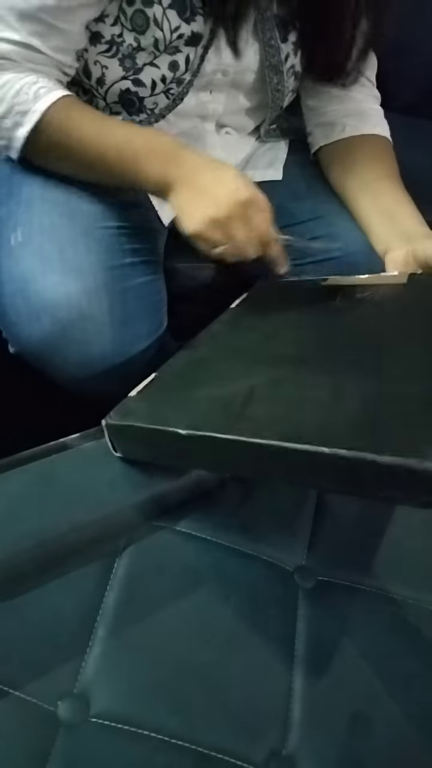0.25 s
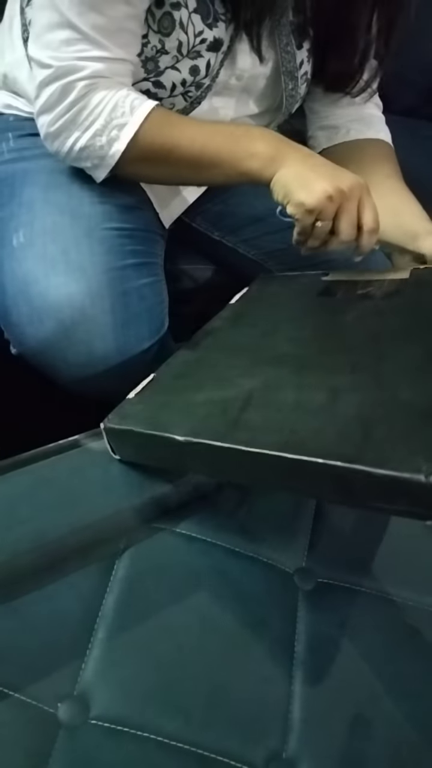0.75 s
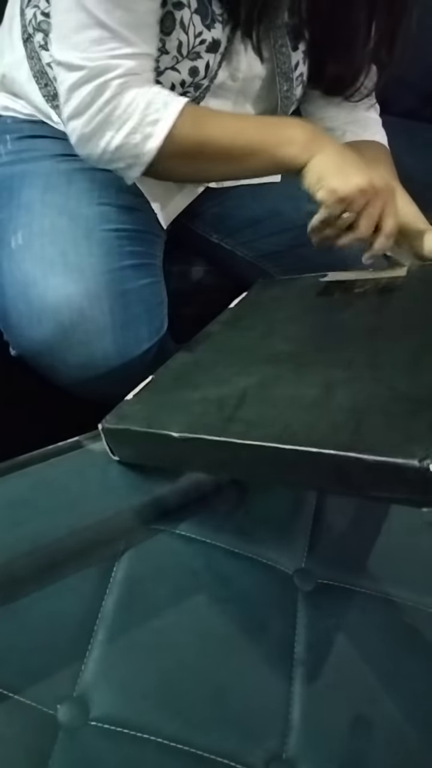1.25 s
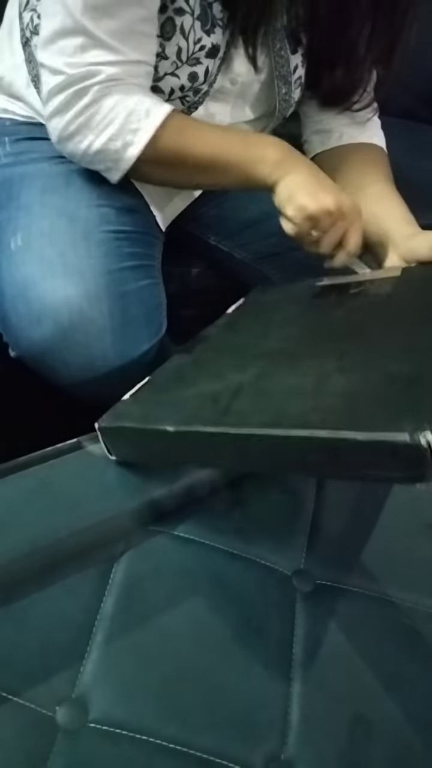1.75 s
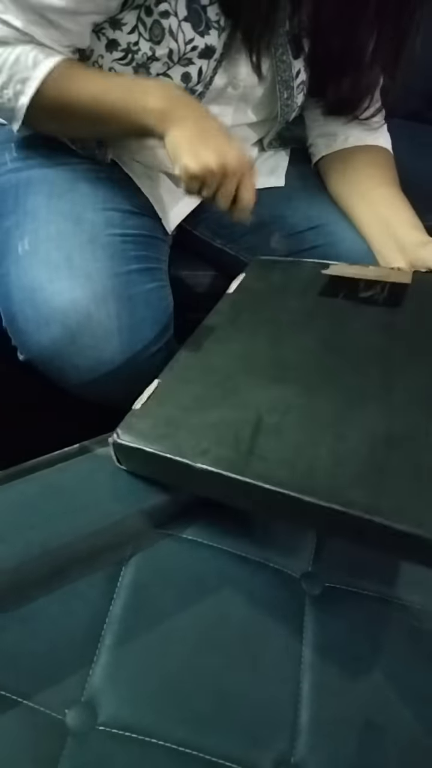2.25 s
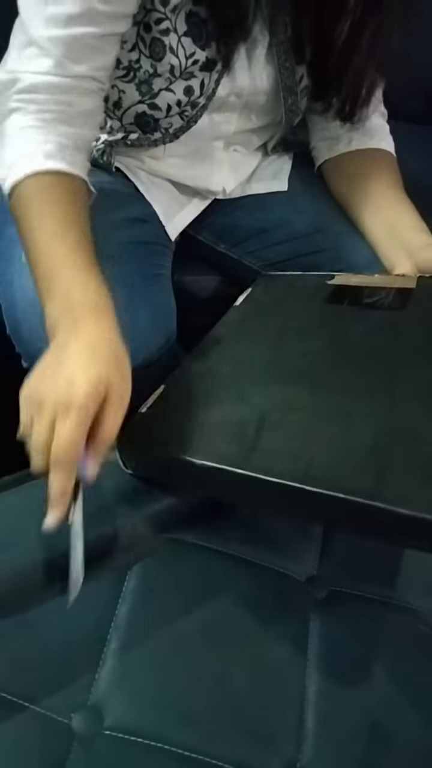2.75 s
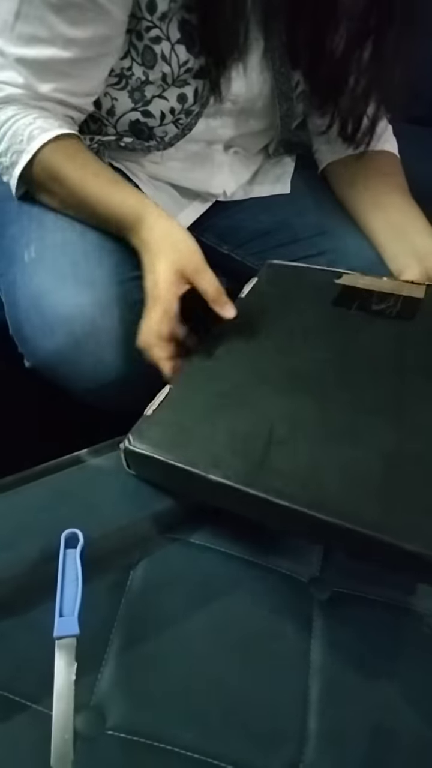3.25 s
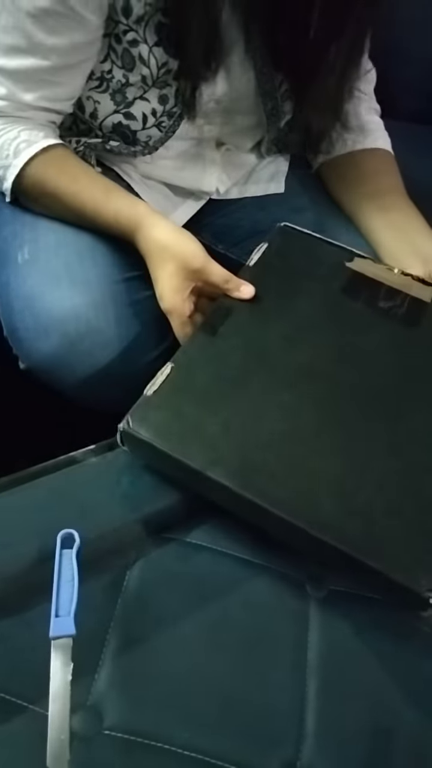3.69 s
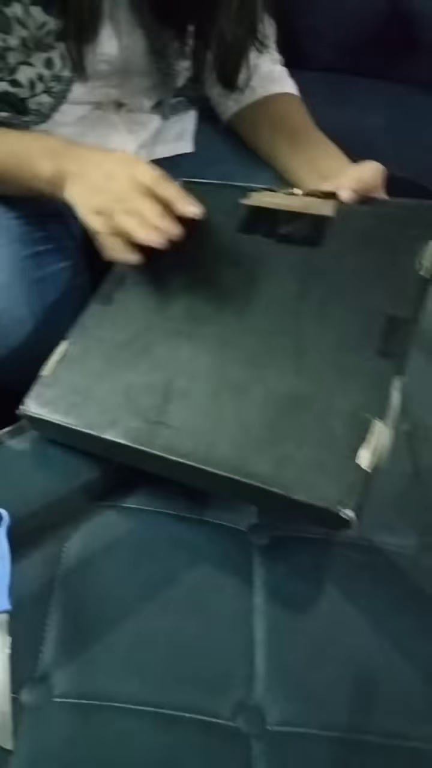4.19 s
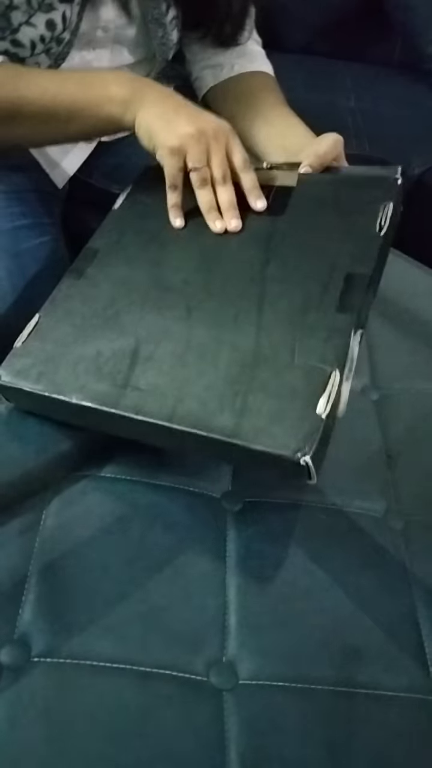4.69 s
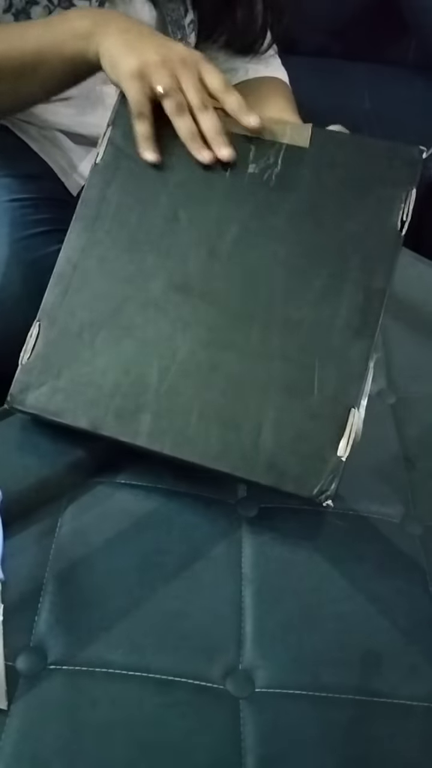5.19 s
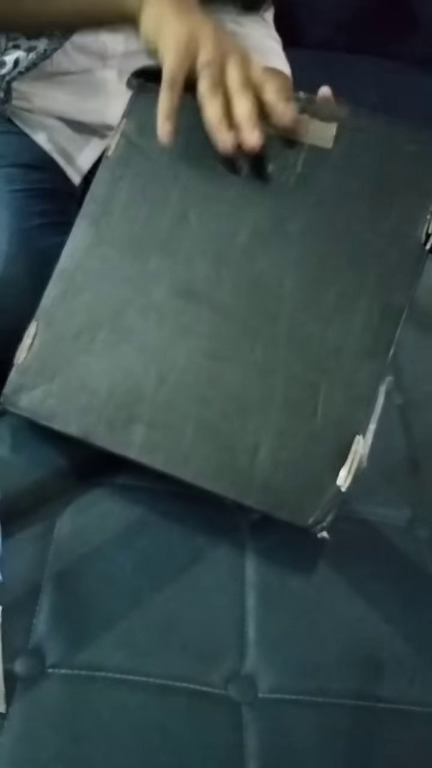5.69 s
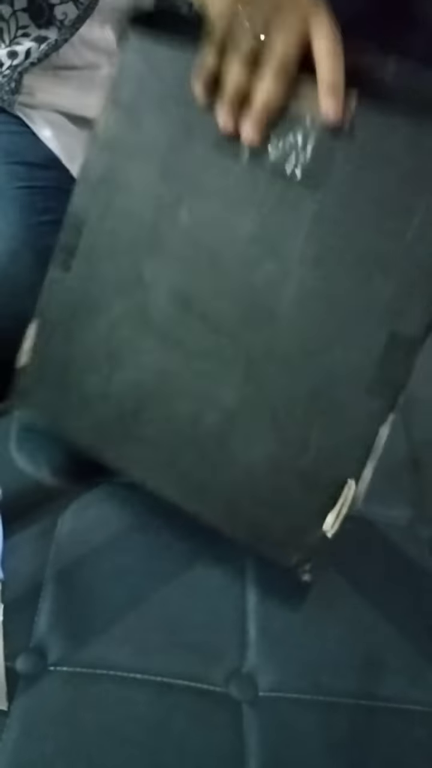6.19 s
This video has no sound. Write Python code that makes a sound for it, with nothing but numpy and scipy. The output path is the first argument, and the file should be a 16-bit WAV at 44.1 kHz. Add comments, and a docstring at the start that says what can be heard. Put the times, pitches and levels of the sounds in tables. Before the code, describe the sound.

Close up in a quiet, hissing small room, a knife cuts packing tape on a flat cardboard box with dry crackles and short rasps, peaking in a burst of sharp snaps. After a pause the knife drops on a glass table, a fast bright metallic chatter with brief glassy ringing. Then the box is turned with soft hollow knocks, and fingers rub and pick lightly at the tape.

```python
"""A knife slits the packing tape of a flat cardboard box in short strokes, then drops, clattering and ringing,
on a glass table; hands turn the box and pick at the tape. Heard close up in a quiet, hissing room, an insect outside.
Tape and cardboard are friction clicks through coloured filters; snaps, knocks and knife are noise bursts and
struck resonances. Creak is a wavering sine, scuffs and insect are resonant noise, rumble, hum and hiss are
filtered noise. A diffuse room tail follows the table sounds and the microphone signal is cut steeply at the top."""
import sys
import numpy as np
from scipy import signal
from scipy.fft import rfft, irfft
from scipy.io import wavfile

SR = 44100
rng = np.random.default_rng(int(sys.argv[2]) if len(sys.argv) > 2 else 0)


def wrap_up_sound(samples):
    """Save the sound to the file named by the first command line argument, as 16-bit audio."""
    columns = np.atleast_2d(samples).T
    # keep every value between -1 and 1, then stretch to whole-number steps
    tamed = np.clip(columns, -1, 1)
    steps = np.round(tamed * 32767).astype(np.int16)
    wavfile.write(sys.argv[1], SR, steps)


N = 283853  # samples


def amp(db):
    """Decibels to gain."""
    return 10 ** (np.asarray(db) / 20)


def rms_one(x):
    """Scales to rms 1."""
    return x / np.sqrt(np.mean(x ** 2) + 1e-20)


def in_time(rows):
    """Interpolates each column of a curve table to one value a sample; the first column is time."""
    s, *columns = np.transpose(rows)
    return [np.interp(np.arange(N) / SR, s, c) for c in columns]


def kernel(spectrum, size=4096):
    """Minimum-phase impulse response of a (hz, level_db) spectrum, from the folded cepstrum; energy 1."""
    hz, level_db = np.transpose(spectrum)
    log_grid = np.log(np.fft.rfftfreq(size, 1 / SR) + 1)
    level_on_grid = np.interp(log_grid, np.log(hz), level_db)
    cepstrum = irfft(np.log(amp(level_on_grid)))
    # fold the second half onto the first
    cepstrum[1:size // 2] *= 2
    cepstrum[size // 2 + 1:] = 0
    response = irfft(np.exp(rfft(cepstrum)))
    return response / np.sqrt(np.sum(response ** 2))


def colour(x, spectrum):
    """Filters x by a spectrum."""
    return signal.fftconvolve(x, kernel(spectrum))[:len(x)]


def drift(rate_hz):
    """Slow random wandering of rms 1: noise below rate_hz, after a second to settle."""
    noise = rng.standard_normal(N + SR)
    b, a = signal.butter(2, rate_hz, fs=SR)
    return rms_one(signal.lfilter(b, a, noise)[SR:])


def ring(clicks, hz, t60_s):
    """A two-pole resonance: a unit click sets a dying sine of starting height 1 ringing."""
    radius = amp(-60 / (t60_s * SR))
    angle = 2 * np.pi * hz / SR
    feedback = [1, -2 * radius * np.cos(angle), radius * radius]
    return signal.lfilter([0, np.sin(angle)], feedback, clicks + 1e-18)


SCATTER_DB = 4  # spread of mode strengths from blow to blow


def strike(times_s, blows_db, modes):
    """Every blow rings every (hz, level_db, t60_s) mode with a strength and sign of its own."""
    at = np.round(times_s * SR).astype(int)
    out = np.zeros(N)
    chance = rng.standard_normal((len(at), 2, len(modes)))
    for k, (hz, level_db, t60_s) in enumerate(modes):
        strength = amp(blows_db + level_db + SCATTER_DB * chance[:, 0, k])
        clicks = np.zeros(N)
        clicks[at] = strength * np.sign(chance[:, 1, k])
        out += ring(clicks, hz, t60_s)
    return out


FIRST_TOUCH_DB = 11.5  # opening click, over the starting level of the noise


def bursts(times_s, peaks_db, t60s_s, spectrum, size=8192):
    """A click and dying noise in one colour, each burst scaled to its peak."""
    out = np.zeros(N + 2 * size)
    response = kernel(spectrum)
    t = np.arange(size) / SR
    for s, peak_db, t60_s in zip(times_s, peaks_db, np.broadcast_to(t60s_s, len(times_s))):
        noise = rng.standard_normal(size) * amp(-60 * t / max(t60_s, 1e-3))
        noise[0] = amp(FIRST_TOUCH_DB)
        burst = signal.fftconvolve(noise, response)
        at = round(s * SR)
        out[at:at + len(burst)] += amp(peak_db) * burst / np.abs(burst).max()
    return out[:N]


ATTACK_S, SAG_DB_PER_S = 0.012, 32


def swells(starts_s, holds_s, levels_db, fall_db_per_s):
    """Gain over time: each event rises over the attack, sags while held, then dies at its fall rate."""
    out = np.zeros(N)
    t = np.arange(SR) / SR
    rise = np.minimum(t / ATTACK_S, 1) ** 2
    for s, hold_s, level_db in zip(starts_s, np.broadcast_to(holds_s, len(starts_s)), levels_db):
        sag_db = SAG_DB_PER_S * np.clip(t - ATTACK_S, 0, hold_s)
        fall_db = fall_db_per_s * np.maximum(t - ATTACK_S - hold_s, 0)
        part = out[round(s * SR):][:SR]  # a view: adding to it adds to out
        part += (rise * amp(level_db - sag_db - fall_db))[:len(part)]
    return out


GRAINS_PER_S, GRAIN_SPREAD_DB = 5000, 2
GRAIN_CLUMP_DB = 2  # rms of the slow level drift


def grains():
    """Fibres and glue letting go: dense uneven clicks that come in clumps; rms 1."""
    sizes = amp(GRAIN_SPREAD_DB * np.minimum(rng.exponential(1, N), 6))
    signs = rng.choice([-1, 1], N)
    present = rng.random(N) < GRAINS_PER_S / SR
    return rms_one(sizes * signs * present * amp(GRAIN_CLUMP_DB * drift(55)))


# strokes of the blade in the tape: start_s, hold_s, hiss_db, cardboard_db (over the hiss)
STROKES = [(.94, 0.0052, -69.5, -6), (1.135, 0.14, -64, 0), (1.31, 0.085, -55.5, -7),
           (1.42, 0.029, -65, -2.5), (1.58, 0.039, -51.5, -7.5), (1.66, 0.033, -66, -9),
           (1.703, 0.01, -51.5, 7.5), (1.72, 0.013, -48, -12), (1.765, 0.054, -53.5, -6),
           (1.82, 0.015, -49, -6), (2.0, 0.028, -52, -7), (2.03, 0.037, -46, -11.5),
           (2.075, 0.019, -46.5, -18), (2.13, 0.044, -63.5, -8), (2.24, 0.0083, -65, -10)]
# fingers rubbing tape and lid: start_s, hold_s, hiss_db, cardboard_db (over the hiss)
RUBS = [(3.505, .005, -63.5, -3), (3.895, .005, -73, 6), (4.2, 0.086, -76, -5), (4.46, .02, -70, -4),
        (4.78, 0.047, -63.5, -7), (4.84, 0.031, -77, 10.5), (5.09, 0.013, -76, -8),
        (5.165, 0.024, -74, -30), (5.39, 0.039, -63.5, -6), (5.45, .005, -62.5, -1.5),
        (5.53, 0.016, -62, -5), (5.635, .02, -63.5, -15), (5.71, 0.026, -59, -5), (5.785, 0.0062, -68, -38),
        (5.9, 0.041, -73.5, 0), (6.06, 0.022, -69, -16), (6.165, 0.079, -67, -7)]
# faint rustle of hands and sleeves between the strokes: time_s, hiss_db, cardboard_db (over the hiss)
RESTLESS = [(0, -68, -8), (.26, -74.5, -4), (.56, -85, 1), (.9, -82, 2.5), (1.06, -75, -4.5),
            (2.0, -64.5, -5), (2.45, -75, -6), (2.6, -88, 0.5), (3.3, -73, 3), (3.42, -71, -6.5),
            (3.85, -77.5, -2.5), (4.38, -68, -7.5), (4.6, -72.5, -7), (5.0, -71.5, 0.5), (5.3, -69, -8),
            (5.9, -66.5, -8.5), (6.14, -63.5, -5), (6.44, -71, -5)]
# colour of blade on tape: pitch_hz, level_db
TAPE = [(1500, -42), (2500, -19), (3200, -12), (4400, -10), (5700, -7.5), (7150, -8), (7900, -1.5),
        (9700, -1.5), (11000, -11), (13000, -13), (15500, -11), (17000, -6)]
# colour of fingertips: pitch_hz, level_db
FINGERS = [(1500, -18), (2500, -35.5), (3500, -30.5), (5300, -17.5), (7200, -11), (7900, -5), (9700, -6),
           (11000, -14), (13000, -15), (15500, -13.5), (17000, -7)]
# colour of cardboard: pitch_hz, level_db
CARDBOARD = [(200, -27.5), (350, -1), (620, 1), (850, -5.5), (1200, -5), (1900, -3.5), (2500, -8.5),
             (4000, -10), (5500, -25), (9000, -51)]
HISS_FALL_DB_PER_S, CARD_FALL_DB_PER_S = 326, 293


def rubbing():
    """The same friction hisses in tape and rustles in cardboard; steel scrapes with more bite than fingertips."""
    friction = grains()
    rustle = colour(friction, CARDBOARD)
    hiss_db, card_db = in_time(RESTLESS)
    out = amp(hiss_db) * (colour(friction, FINGERS) + amp(card_db) * rustle)
    for table, spectrum in ((STROKES, TAPE), (RUBS, FINGERS)):
        start_s, hold_s, hiss_db, card_db = np.transpose(table)
        out += swells(start_s, hold_s, hiss_db, HISS_FALL_DB_PER_S) * colour(friction, spectrum)
        out += swells(start_s, hold_s, hiss_db + card_db, CARD_FALL_DB_PER_S) * rustle
    return out


# tape snapping free: start_s, peak_db, box_db (drive of the box ring over the peak)
SNAPS = [(0.6374, -51, -2), (0.9486, -50, 5), (1.1266, -44.5, -0.5), (1.138, -47.5, 4), (1.1533, -35, -6),
         (1.1675, -37.5, -2), (1.3044, -47, -20), (1.327, -56, -16), (1.3339, -33.5, -9), (1.3464, -34, -7),
         (1.3507, -32, -1), (1.3997, -46, 2), (1.4389, -43.5, 5), (1.5385, -37, -3), (1.5974, -40, -25),
         (1.6074, -36, -9), (1.6312, -38, -6), (1.6824, -44, -1), (1.6971, -14.5, -4.5),
         (1.709, -19.5, -10), (1.7127, -37, 8), (1.726, -18.5, -7), (1.743, -34, -21), (1.7584, -21.5, -6),
         (1.7752, -35, -23), (1.824, -29, -34), (1.8477, -34, -8), (2.0474, -40, -1), (2.213, -45, -2),
         (2.2544, -47, -6), (3.9051, -44.5, 3.5), (4.7994, -55, -12), (5.0187, -60, 3), (5.033, -56, 9),
         (5.1861, -43, -28), (5.4094, -50.5, 6.5), (5.46, -34.5, -27), (5.558, -40.5, -3.5),
         (5.6436, -32.5, -21), (5.742, -42, -15), (5.7973, -39.5, -24), (6.3929, -45.5, -7)]
# resonances of the box panels: pitch_hz, level_db, t60_s
BOX = [(283, -24, 0.067), (577, -17.5, 0.027), (663, -15.5, 0.045), (900, -41, 0.013), (1413, -12.5, 0.013),
       (2023, -14.5, 0.016), (2390, -14.5, 0.01)]
CRACKLE_T60_S = 0.007


def snaps():
    """A bright crack of tape, and the panels ringing briefly after it."""
    start_s, peak_db, box_db = np.transpose(SNAPS)
    crack = bursts(start_s, peak_db, CRACKLE_T60_S, TAPE)
    return crack + strike(start_s, peak_db + box_db, BOX)


# knife touching the glass: start_s, peak_db, chatter_t60_s, weight_db (on the plate)
CLATTER = [(2.9264, -10.5, 0.06, -31.5), (2.9299, -15, 0.027, -32.5), (2.935, -21, 0.042, -37),
           (2.9412, -8.5, 0.013, -24), (2.9454, -12.5, .02, -37.5), (2.9490, -16.5, 0.013, -52),
           (2.9553, -10.5, 0.019, -31), (2.9622, -13, 0.0081, -28), (2.9730, -28, 0.036, -35.5),
           (2.9889, -6, 0.0053, -48), (2.9944, -17, 0.0049, -47), (3.0361, -30, 0.0063, -33.5),
           (3.0530, -19, 0.00458, -40.5), (3.0568, -15.5, 0.0056, -47), (3.0683, -12.5, 0.012, -34),
           (3.0736, -25, 0.015, -47), (3.1105, -19, .004, -39.5), (3.1150, -23, 0.011, -45),
           (3.1196, -20, 0.0079, -43.5), (3.1356, -7.5, 0.003, -39.5), (3.1516, -14, 0.011, -39),
           (3.1660, -20, 0.012, -52), (3.1900, -28, 0.01, -40)]
# colour of the chattering crack: pitch_hz, level_db
CRACK = [(2500, -55.5), (3700, -17), (4400, -32.5), (5250, -11.5), (6250, -4), (7000, -10), (7800, -1),
         (9500, 2.5), (10500, -8.5), (13000, -11), (15500, -11.5), (17000, -11)]
# resonances of the steel blade: pitch_hz, level_db, t60_s
BLADE = [(3880, -8.5, 0.058), (4520, -6, 0.028), (4570, -8.5, 0.032), (5020, -9.5, 0.027),
         (5500, -14.5, 0.037), (6240, -6.5, 0.032), (6500, -13, 0.042), (7050, 2.5, 0.0192),
         (7150, -5.5, 0.012), (8300, -16, 0.023), (8300, -5, 0.016), (8600, -2, 0.023), (10040, -22, 0.031),
         (9140, 2.5, 0.021)]
# colour of the plate's thud: pitch_hz, level_db
THUD = [(40, -9), (120, -5), (500, -16), (1000, -8), (1700, -3), (2200, -8), (3300, -3), (4200, -0.5),
        (6000, -23.5)]
# resonances of the glass plate: pitch_hz, level_db, t60_s
PLATE = [(500, -21, 0.099), (653, -25.5, 0.51), (900, -25, 0.22), (1103, -24, 0.19), (1282, -19, 0.19),
         (1420, -23.5, 0.56), (1647, -21, 0.3), (1675, -20.5, 0.276), (1742, -19.5, .25), (1850, -19, 0.36),
         (2040, -13.5, 0.16), (2118, -20, 0.27), (2114, -12, .3), (2270, -22, 0.1), (2690, -13.5, 0.1095),
         (2566, -38, 0.1), (3226, -13, 0.14), (3566, -26, 0.05)]
BLADE_DB, PLATE_DB = -19.5, -4.5  # blade drive over the crack's peak, plate drive over the weight
THUD_T60_S = 0.13


def knife():
    """Each touch of steel on glass: a chattering crack, the blade's short ring, the plate's thud and longer ring."""
    start_s, peak_db, chatter_t60_s, weight_db = np.transpose(CLATTER)
    thud = bursts(start_s, weight_db, THUD_T60_S, THUD)
    plate = strike(start_s, weight_db + PLATE_DB, PLATE)
    crack = bursts(start_s, peak_db, chatter_t60_s, CRACK)
    blade = strike(start_s, peak_db + BLADE_DB, BLADE)
    return crack + blade + thud + plate


# knuckles and corners knocking the box: start_s, peak_db, pitch_hz, thump_db (over the peak)
KNOCKS = [(0.561, -57, 540, -22), (2.115, -42, 238, -30), (3.517, -34, 480, -15), (3.907, -36, 627, -12.5),
          (4.289, -62.5, 292, 0), (4.477, -70, 259, -22.5), (4.857, -55, 298, -27), (5.098, -46, 265, -14),
          (5.454, -55.5, 448, -6.5), (5.551, -49.5, 527, -12), (5.64, -41, 292, -21),
          (5.752, -43.5, 523, -13)]
# colour of the rattle inside the box: pitch_hz, level_db
HOLLOW = [(90, -34), (160, 4), (320, -20), (480, -5.5), (600, -3), (760, 4), (1000, 2.5), (1350, -15),
          (2000, -58), (4000, -44)]
HOLLOW_DB, HOLLOW_T60_S = -15, 0.36  # level is over the knock's peak
PUSH_T60_S, KNOCK_T60_S = 0.013, 0.018
THUMP_HZ, THUMP_T60_S = 59, 0.22


def knocks():
    """Soft contacts: a short noisy push rings a panel and thumps the whole box, with a hollow rattle inside."""
    start_s, peak_db = np.transpose(KNOCKS)[:2]
    out = bursts(start_s, peak_db + HOLLOW_DB, HOLLOW_T60_S, HOLLOW)
    t = np.arange(SR // 2) / SR
    for s, peak_db, hz, thump_db in KNOCKS:
        push = rng.standard_normal(SR // 2) * amp(-60 * t / PUSH_T60_S)
        panel = ring(push, hz, KNOCK_T60_S)
        thump = ring(push, THUMP_HZ, THUMP_T60_S)
        blow = panel / np.abs(panel).max() + amp(thump_db) * thump / np.abs(thump).max()
        at = round(s * SR)
        out[at:at + SR // 2] += amp(peak_db) * blow[:N - at]
    return out


# a flap creaks as it bends, its pitch mostly rising: time_s, pitch_hz, level_db
CREAK = [(4.81, 600, -83), (4.84, 653, -63), (4.865, 697, -53.5), (4.885, 768, -58), (4.905, 746, -73),
         (4.93, 754, -64.5), (4.96, 760, -85)]
CREAK_WOBBLE, CREAK_FLUTTER_DB = 0.03, 4  # rms: fraction of the pitch, and level


def creak():
    """A stick-slip tone, unsteady in pitch and strength, that sounds only while the flap bends."""
    hz, level_db = in_time(CREAK)
    t = np.arange(N) / SR
    bending = (t > CREAK[0][0]) & (t < CREAK[-1][0])
    turns = np.cumsum(hz * (1 + CREAK_WOBBLE * drift(60))) / SR
    strength = amp(level_db + CREAK_FLUTTER_DB * drift(70))
    return bending * strength * np.sin(2 * np.pi * turns)


# fingers sliding on the lid: start_s, length_s, pitch_hz, width_hz, level_db
SCUFFS = [(0.089, 0.047, 1320, 100, -73), (0.222, 0.026, 1463, 100, -74), (4.459, 0.063, 1810, 1000, -65.5),
          (4.846, 0.028, 2320, 890, -55), (5.414, 0.086, 1790, 600, -62), (6.159, 0.091, 2020, 900, -69.5)]


def scuffs():
    """Skin slipping on the coated lid: a swell of noise through one resonance, applied twice."""
    out = np.zeros(N)
    for s, length_s, hz, width_hz, level_db in SCUFFS:
        t60_s = np.log(1000) / np.pi / width_hz
        noise = rng.standard_normal(SR // 4)
        resonant = rms_one(ring(ring(noise, hz, t60_s), hz, t60_s))
        slip = resonant[:round(min(length_s, 0.25) * SR)]
        out[round(s * SR):][:len(slip)] += amp(level_db) * slip * np.hanning(len(slip))
    return out


# box and table top rumbling when the knife lands or the box is knocked or moved: start_s, level_db
JOLTS = [(.1, -69.5), (.74, -73), (.93, -92), (1.13, -73), (1.32, -66), (1.68, -72), (1.99, -65),
         (2.14, -63.5), (2.92, -69), (3.12, -62), (3.27, -65.5), (3.51, -59.5), (3.895, -54.5),
         (4.845, -68), (5.09, -61.5), (5.528, -63), (5.63, -58), (5.73, -64.5), (5.9, -66.5)]
# colour of the rumble: pitch_hz, level_db
RUMBLE = [(20, -11.5), (55, -4.5), (120, -3.5), (200, -3.5), (310, -8), (500, -15), (700, -23.5),
          (1300, -69.5)]
RUMBLE_DB = -71.5  # steady part
JOLT_HOLD_S, JOLT_FALL_DB_PER_S = 0.0036, 148


def rumble():
    """A low murmur of box and table, filtered noise that swells at each jolt from the knife or the box."""
    start_s, level_db = np.transpose(JOLTS)
    gain = amp(RUMBLE_DB) + swells(start_s, JOLT_HOLD_S, level_db, JOLT_FALL_DB_PER_S)
    return gain * colour(rng.standard_normal(N), RUMBLE)


ROOM_DB, ROOM_BUILD_S = -9.5, 0.006
ROOM_T60_S, TREBLE_T60_S, ROOM_SPLIT_HZ = 0.48, 0.37, 4500


def room(x):
    """Diffuse reflections that thicken as the first walls answer; the treble dies sooner."""
    t = np.arange(SR) / SR
    white = rng.standard_normal(SR)
    low = signal.lfilter(*signal.butter(1, ROOM_SPLIT_HZ, fs=SR), white)
    treble = white - low
    tail = low * amp(-60 * t / ROOM_T60_S) + treble * amp(-60 * t / TREBLE_T60_S)
    tail *= np.minimum(t / ROOM_BUILD_S, 1) ** 2
    tail /= np.sqrt(np.sum(tail ** 2))
    return amp(ROOM_DB) * signal.fftconvolve(x, tail)[:N]


# colour of the low hum: pitch_hz, level_db
HUM = [(12, -42), (20, 6), (32, -7), (53, -5), (104, -5), (224, -31.5), (295, -8), (321, -35), (408, -6),
       (476, -29.5), (1200, -31.5), (1560, -68.5), (2640, -120)]
# colour of the hiss: pitch_hz, level_db
HISS = [(600, -13.5), (1200, -17), (2300, -16.5), (3600, -11.5), (4200, -14), (5300, -23.5), (6000, -12.5),
        (7300, -15), (8000, -2), (9600, -3.5), (10500, -12), (12500, -14), (15500, -7), (17000, -0.5)]
# loudness of the insect outside: time_s, level_db
INSECT = [(0, -85), (3.2, -87.5), (3.4, -75), (3.9, -83), (4.6, -81), (5, -88), (6.44, -85)]
HUM_DB, HISS_DB = -73, -64.5
INSECT_HZ, INSECT_WIDTH_HZ = 3556, 30


def background():
    """Steady hum and hiss of filtered noise, and noise in a narrow resonance as a flickering insect note."""
    hum, hiss, note = rng.standard_normal((3, N))
    note_t60_s = np.log(1000) / np.pi / INSECT_WIDTH_HZ
    note = rms_one(ring(note, INSECT_HZ, note_t60_s))
    insect = amp(in_time(INSECT)[0]) * note
    return amp(HUM_DB) * colour(hum, HUM) + amp(HISS_DB) * colour(hiss, HISS) + insect


def scene():
    """Everything at the table sounds in the room, over the background."""
    near = rubbing() + snaps() + knife() + knocks() + creak() + scuffs() + rumble()
    return (near + room(near) + background())[None]


CUTOFF_HZ = 16600


def record(dry):
    """The microphone signal loses its top to a steep low-pass."""
    low_pass = signal.cheby2(16, 70, CUTOFF_HZ, fs=SR, output="sos")
    return signal.sosfilt(low_pass, dry)


dry = scene()
out = record(dry)
wrap_up_sound(out)
```